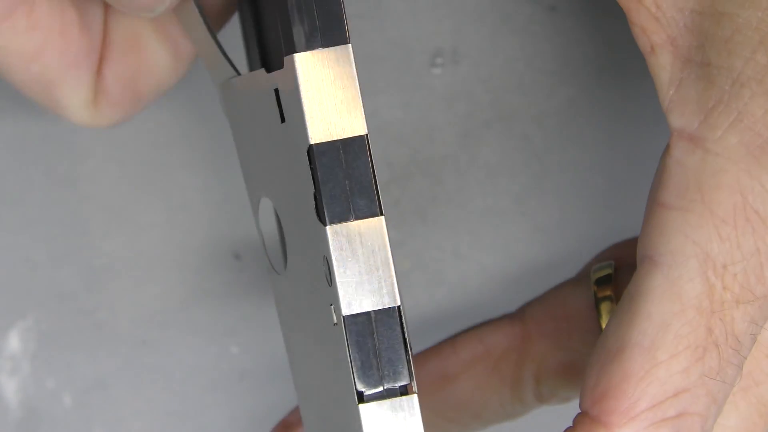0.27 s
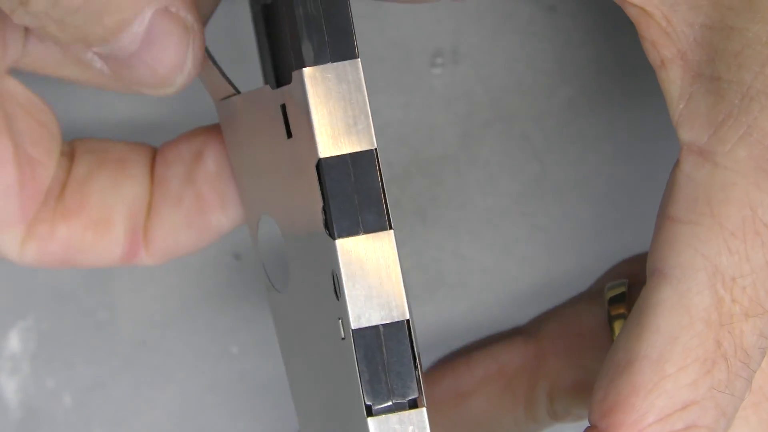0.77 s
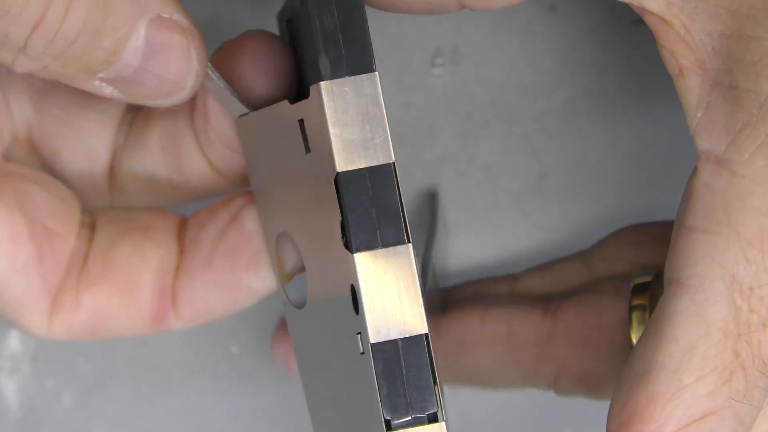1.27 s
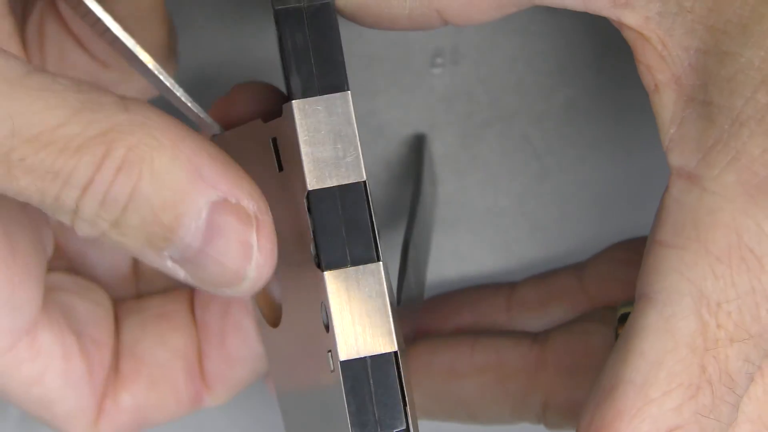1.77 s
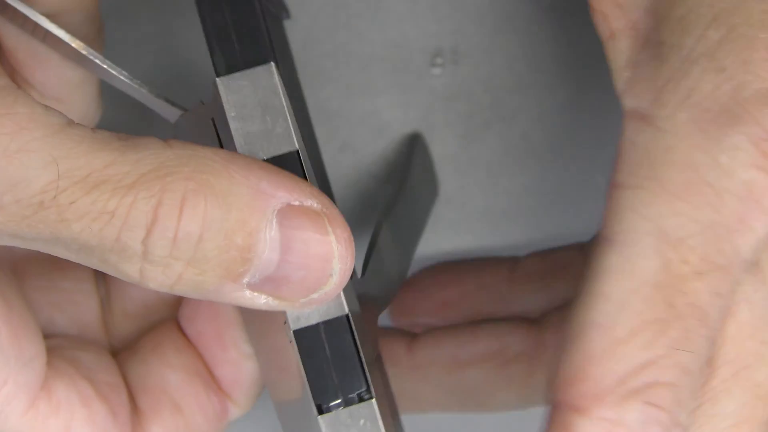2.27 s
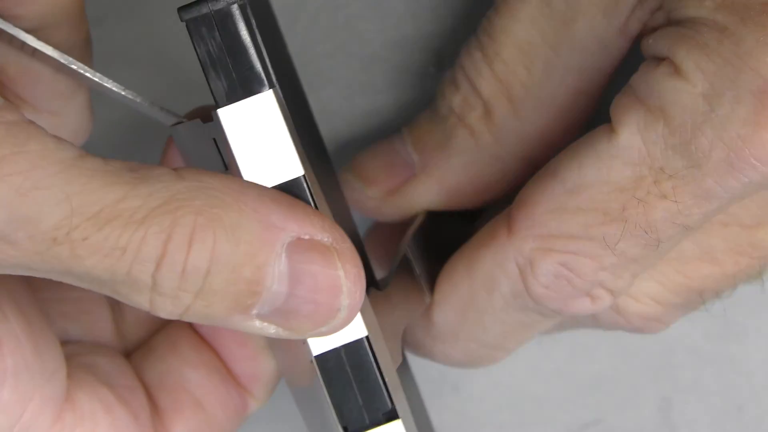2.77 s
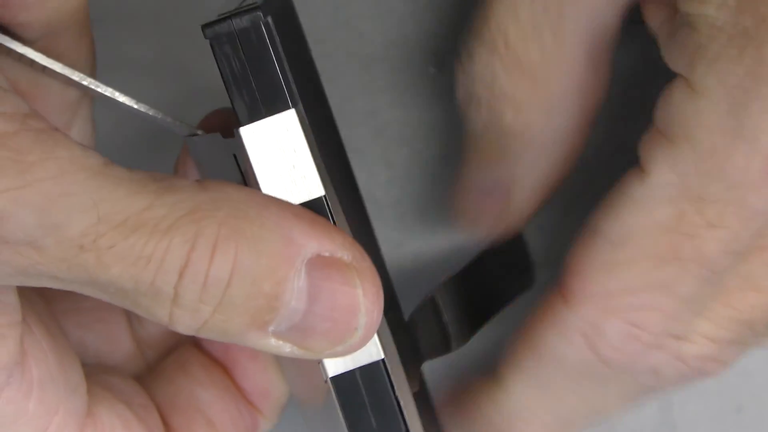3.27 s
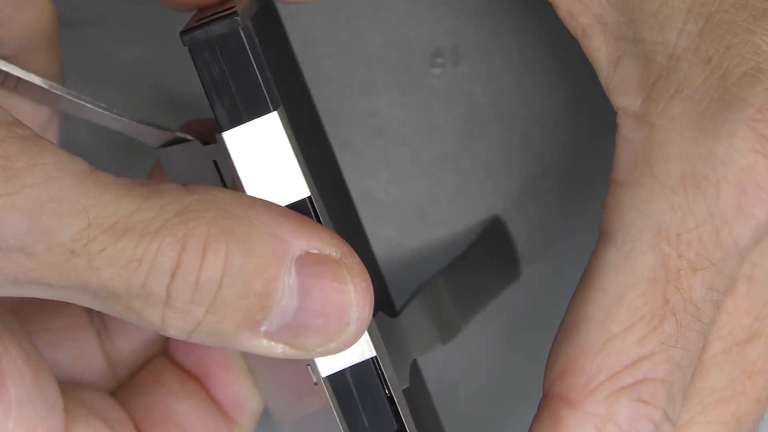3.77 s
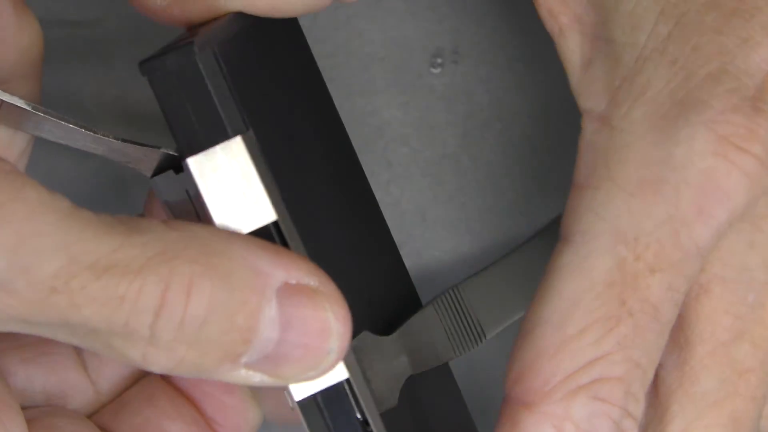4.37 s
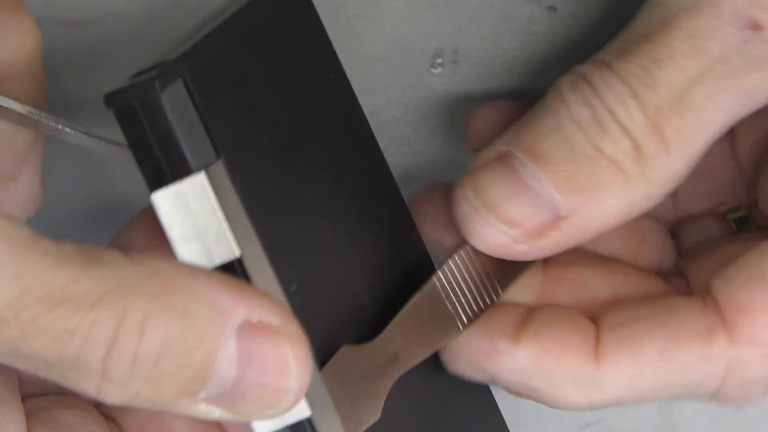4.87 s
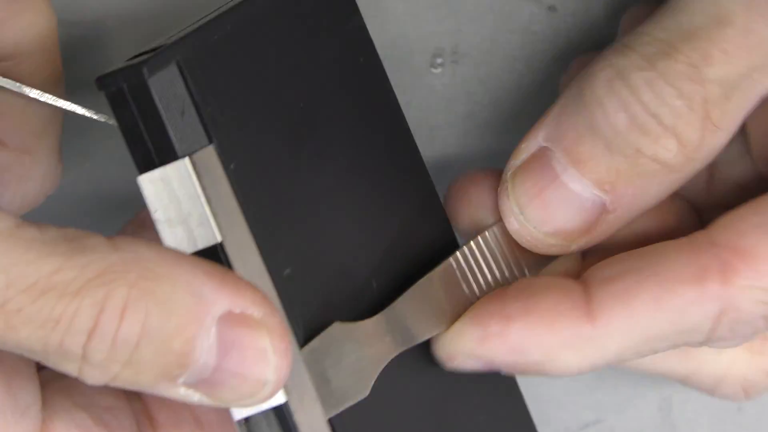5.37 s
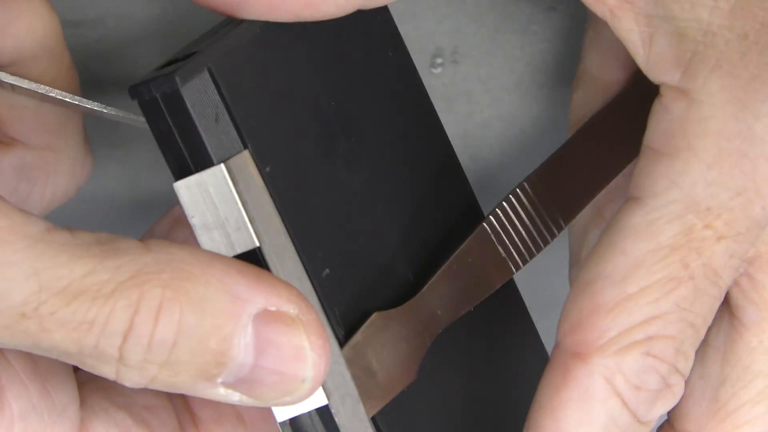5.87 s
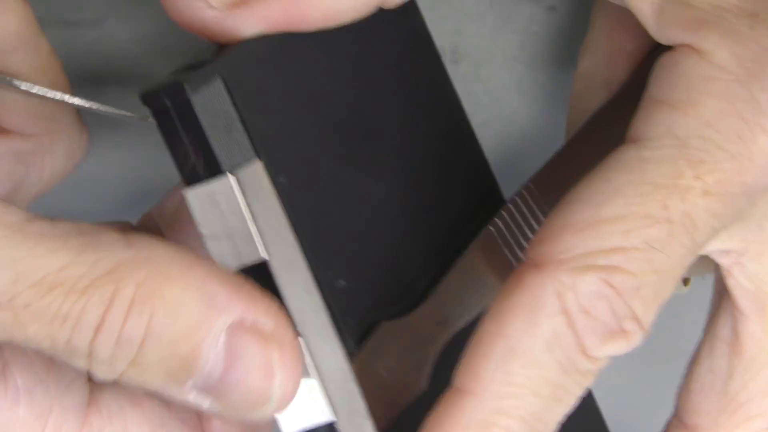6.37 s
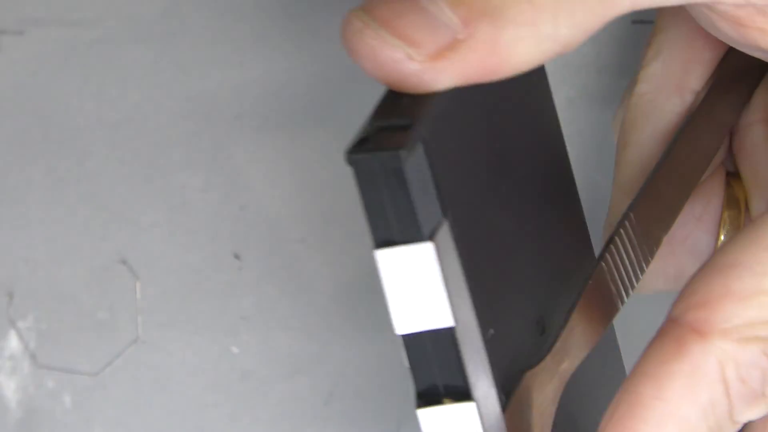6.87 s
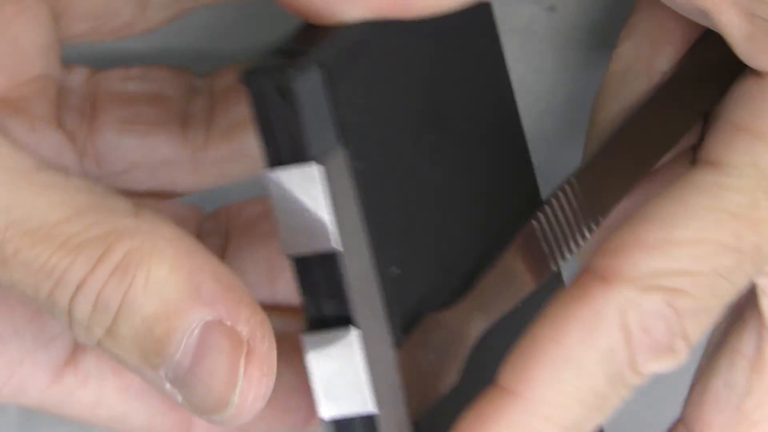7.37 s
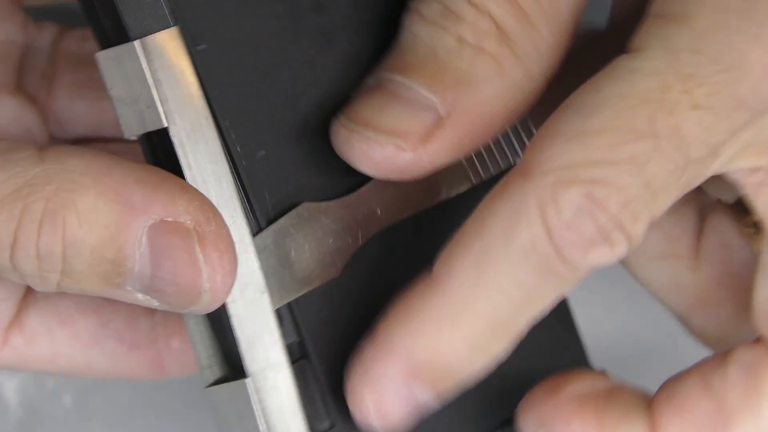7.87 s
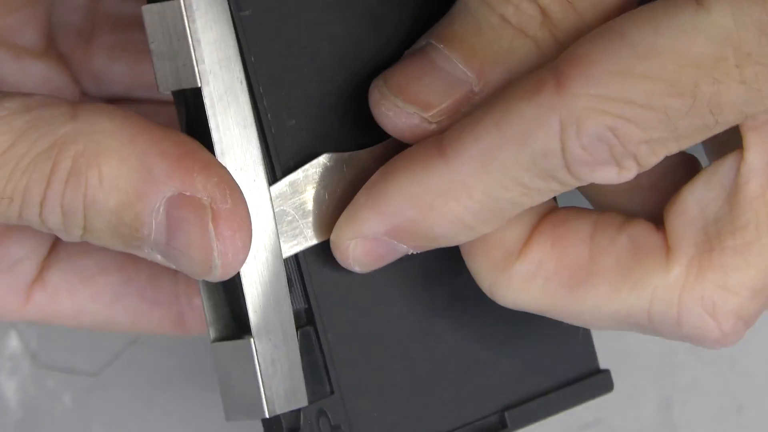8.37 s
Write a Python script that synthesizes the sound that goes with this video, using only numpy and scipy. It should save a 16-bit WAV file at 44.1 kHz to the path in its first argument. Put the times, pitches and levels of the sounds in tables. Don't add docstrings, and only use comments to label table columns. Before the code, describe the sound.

Small plastic clicks, snaps and blade scrapes as a plastic shell is pried apart, peaking in one hard crack in a quiet, humming workshop.

```python
import sys
import numpy as np
from scipy import signal
from scipy.fft import rfft, irfft, next_fast_len
from scipy.io import wavfile
from scipy.ndimage import uniform_filter1d, map_coordinates

SR = 44100
rng = np.random.default_rng(int(sys.argv[2]) if len(sys.argv) > 2 else 0)


def wav_record(signal):
    frames = np.transpose(np.atleast_2d(signal))
    bounded = np.clip(frames, -1, 1)
    quanta = np.round(bounded * 32767).astype(np.int16)
    wavfile.write(sys.argv[1], SR, quanta)


def level_to_linear(level):
    exponent = np.asarray(level, float) / 20
    return 10 ** exponent


N = 380583

# freq_hz, density_db_per_hz
HISS_SPECTRUM = [(15, -43), (25, -14.5), (75, -14), (144, -13), (179, -11), (351, -15), (447, -18),
                 (526, -31.5), (901, -22), (1630, -20.5), (2320, -26), (3380, -25.5), (6630, -34),
                 (7580, -34), (15700, -32)]
HISS_LEVEL_DB = -65
# freq_hz, likeness_0_to_1
HISS_LIKENESS = [(60, 0.38), (200, 0.18), (640, 0.68), (1410, 0.65), (3100, 0.51), (5000, 0.52),
                 (6000, 0.89), (8600, 0.87), (11000, .6), (15000, 0.31)]
# centre_hz, width_hz, level_db
FAN_TONES = [(1830, 40, 4.5), (1960, 83, -4.5), (2150, 27, -5.5), (2360, 56, -0.5), (3550, 46, -7.5),
             (3550, 76, -18), (4700, 28, -15), (11600, 54, -14)]
# pitch_hz, level_db
WHINE_TONES = [(7321, -86.5), (14637, -85.5)]
# time_s, level_db
DRONE_LEVEL = [(0.0, -84), (0.12, -69), (0.21, -94), (0.46, -80), (0.91, -85), (1.08, -82), (1.15, -77),
               (1.25, -68.5), (1.34, -68), (1.46, -66.5), (1.8, -90), (2.19, -67), (2.28, -76), (2.6, -79),
               (2.71, -66), (3.17, -72.5), (3.24, -81), (3.39, -71), (3.56, -97), (3.6, -76.5), (4.2, -65),
               (4.37, -89), (4.45, -71), (4.49, -82), (5.12, -85), (5.79, -72), (5.89, -80), (6.51, -85),
               (6.75, -102), (6.82, -65.5), (7.04, -62), (7.09, -88), (7.16, -55), (7.26, -45), (7.33, -57),
               (7.45, -71), (7.55, -74), (7.76, -88), (7.91, -77), (8.27, -79), (8.34, -84), (8.63, -89)]
# centre_hz, width_hz, level_db
DRONE_MODE = [(75, 12, 0)]
# freq_hz, t60_s, level_db
ROOM_DECAY = [(216, 0.52, 7), (755, 0.53, 3.5), (1510, 0.62, -4), (4160, 0.43, -1.5), (9300, 0.32, -2),
              (15000, 0.26, -11.5)]
# freq_hz, likeness_0_to_1
ROOM_LIKENESS = [(100, 0.22), (400, 0.83), (1500, 0.7), (4500, 0.41), (6000, 0.99), (8600, 0.97),
                 (12000, 0.57)]
# delay_s, level_db
NEAR_ECHOES = [(.0037, -5.5), (.0058, -7), (.0092, -17.5), (0.0131, -11), (.021, -18.5), (.027, -15)]
# start_s, peak_db, pitch_hz
DESK_KNOCKS = [(0.98, -55, 339), (1.2, -64, 207), (1.523, -57, 228), (2.014, -58.5, 266), (2.133, -56, 196),
               (3.365, -63, 223), (4.077, -57, 196), (5.039, -62, 423), (5.063, -75, 180),
               (5.558, -47, 664), (5.743, -52, 337), (6.165, -48, 520), (6.831, -61, 156),
               (6.957, -53, 183), (6.978, -49.5, 284), (7.147, -29, 476), (7.169, -41, 796),
               (2.134, -59.5, 188),
    (5.743, -60, 178),
    (6.956, -46, 207),
    (7.151, -37.5, 206),
    (7.189, -44, 283),
]
# (pitch_hz, level_db, t60_s)
BLADE_RINGS = [
    (6.42, -60, [(9450, 0, .05), (10450, -2, .06)]),
    (6.455, -56, [(2470, -4, .08), (4670, -3, .12), (7440, 0, .1), (10450, -6, .1), (13100, -8, .05)]),
    (6.958, -51, [(10310, -2, .16), (13060, 0, .16)]),
    (7.149, -40, [(3765, -2, .12), (5512, 0, .16), (6328, -8, .1), (10316, -6, .1)]),
]
# centre_hz, width_hz, level_db
SHELL_MODES = [(1056, 26, -2), (1380, 40, 3.5), (1610, 197, 7.5), (1744, 24, 0), (2021, 83, 9),
               (2327, 150, -6), (3010, 73, -27.5), (3826, 91, -9), (4240, 98, -3.5)]
# time_s, body_db, fizz_db
SCRAPE_STROKES = [
    [(0.0, -68, -84), (0.146, -66, -89.5), (0.3, -81, -72.5)],
    [(0.35, -73, -73), (0.512, -55, -78.5), (0.8, -92, -83)],
    [(1.85, -65.5, -78), (2.02, -64, -80)],
    [(3.7, -60, -83), (3.802, -65, -80), (3.85, -41, -67)],
    [(4.0, -70, -64), (4.084, -56.5, -60.5), (4.276, -68, -63), (4.444, -60, -64), (4.5, -65, -74)],
    [(4.85, -71, -74), (4.94, -61.5, -79), (5.3, -75, -97)],
    [(5.47, -56, -78), (5.528, -35.5, -58), (5.634, -56, -65), (5.696, -48.5, -67.5), (5.92, -59.5, -70)],
    [(6.1, -73, -77), (6.18, -81.5, -107), (6.292, -65, -73), (6.35, -64, -52), (6.55, -56.5, -77)],
    [(7.85, -65, -77), (7.928, -62, -70), (8.2, -70, -58)],
]
# start_s, peak_db, pitch_hz, ribs_db, edge_db, length_s
SHORT_SLIDES = [(0.0094, -42.5, 1420, -26, -22, 0.039), (0.452, -57, 1610, -23, -16, 0.037),
                (0.5385, -43.5, 1610, -26, -14, 0.035), (0.6015, -65.5, 1770, -21.5, -19, 0.014),
                (1.002, -46, 1540, -23, -9, 0.028), (2.1095, -36, 1610, -16, -8.5, 0.014),
                (3.3454, -45, 1490, -7, -9, 0.043), (3.761, -52, 1390, -2.5, -3, 0.031),
                (5.7006, -45, 1460, 5.5, -5, 0.049), (5.806, -44.5, 1930, -17, -27, 0.036),
                (6.412, -49, 1410, -5, -9, 0.025), (6.4497, -36.5, 1610, -11.5, -10, 0.02),
                (6.816, -54.5, 1880, -17, -12, 0.024), (6.926, -57, 1360, -4, -2.5, 0.03),
                (7.839, -47, 1580, -12, -8, 0.01), (7.8846, -35.5, 1610, -7.5, -15, 0.03),
                (8.3384, -47.5, 2110, -3, -10.5, 0.016)]
# start_s, peak_db, wall_hz, ribs_db, edge_db,
# looseness_db
CATCH_SNAPS = [(0.3721, -51, 1560, -29, -25, 4), (0.7188, -53, 1720, -20, -24, 0),
               (0.7522, -53.5, 1520, -26, -24, 0), (0.9802, -38, 1970, -31, -24, 4.5),
               (1.0095, -55.5, 1550, 0.5, -14, 6), (1.27, -26, 2560, -47, -23, 3.5),
               (1.269, -28.5, 1700, -8, -10, -13), (1.2839, -39, 1610, -21, -26, 0),
               (1.2974, -41, 1620, -17, -15, 8), (1.3392, -38, 1570, -11, -22, -11),
               (1.431, -49, 2020, -23, -23, -5), (1.483, -49.5, 1590, -25, -25, 2),
               (1.5253, -40, 1570, -25.5, -45, 5.5), (1.713, -57.5, 2280, -25, -10, 21),
               (1.7871, -45, 1520, -8, -10, 5), (1.9495, -52.5, 1600, -26, -22, 16),
               (1.9789, -43.5, 1463, -18, -20, 2), (2.0128, -32.5, 1610, -3, -13, 2),
               (2.032, -42, 2780, -4, -23, -4), (2.0807, -47, 1580, -14, -16, 4),
               (2.1224, -29, 2040, -35, -16, 2), (2.134, -21.5, 1540, -38, -40, 0),
               (2.1418, -31, 1880, -29, -30.5, -6), (2.2903, -48.5, 1580, -10, -6, 8.5),
               (3.3682, -43.5, 1520, -20, -23, -12), (3.8486, -30, 2640, -5.5, 7.5, 4),
               (3.8565, -33, 1580, 0, 3, 6), (3.8722, -33.5, 1670, 1, 13, -6),
               (4.0364, -59, 1630, 5, 11, 0), (4.0752, -39.5, 2140, -1, -14, 2),
               (4.137, -51.5, 2240, 7, 4, 3.5), (4.1894, -47, 1890, -11, -4, -6),
               (4.2397, -66, 1840, 6, 8, 16), (4.26, -69, 1830, 6, 2, 5),
               (4.3175, -32, 1610, -25, -36, -1.5), (4.4648, -49, 1650, -4.5, -12, 0),
               (4.7681, -44.5, 1130, -4, -21, 1.5), (4.9057, -52, 1820, -23, -20, 12),
               (5.2618, -51, 1570, -6, -18, 7), (5.458, -32.5, 1970, -23, -38, -0.5),
               (5.5604, -19.5, 1970, -23, -26, -7.5), (5.5944, -21.5, 1970, -30, -33, 5.5),
               (5.6316, -27, 2000, -23, -41, -0.5), (5.7338, -42.5, 1680, -17, -7, 0),
               (5.7413, -25, 1720, -20, -31, 1), (5.8282, -43, 1860, -9, -26, 0),
               (5.8325, -38, 1860, -35, -29, -5), (6.1157, -45.5, 1790, -10, -27, 1.5),
               (6.1419, -26.5, 1850, -22, -43, -3), (6.1677, -26.5, 1870, -16, -41, -4.5),
               (6.1786, -27.5, 1480, -36, -44, -3.5), (6.2781, -37.5, 1570, -22, -37, -0.5),
               (6.2938, -38.5, 1560, -30, -31, -1), (6.314, -56, 1670, -22, -24, 4),
               (6.3624, -46, 1510, -19, -18, -4), (6.916, -50.5, 1380, -7.5, -6.5, 17),
               (6.9566, -28, 1640, -40, -11.5, 2.5), (6.9635, -28, 1560, -33, -24, 3),
               (6.9824, -33, 1510, -42, -39, 9), (6.9988, -33.5, 1510, -31, -21, 1),
               (7.1474, -19, 1150, 0.5, -0.5, 2), (7.1499, -9.5, 1700, -44, -24, -13.5),
               (7.1543, -16.5, 1320, -5, -7, 2), (7.1569, -20.5, 1490, -40, -21, 4),
               (7.172, -16.5, 1340, -33, -17, 7), (7.2486, -28, 1470, -4.5, -16, 6),
               (7.45, -47.5, 1350, -11, -15, 11), (7.6584, -37.5, 1700, -3.5, -14, 2),
               (7.6718, -42, 1770, -16, -25, -19), (7.6797, -46.5, 1530, -36, -23, 3),
               (7.8365, -58, 1560, -21, -9, -13), (7.8913, -44, 1660, 0, -4.5, -1),
               (7.9056, -42, 2000, -26, -12, 10), (7.9502, -46, 1610, 0, -24, -1),
               (8.0592, -39.5, 1760, -22, -17, -5), (8.0697, -42.5, 1910, -6, -22, 3),
               (2.1343, -24, 1600, -14, -24, -2),
    (4.2605, -62, 1800, 10, 8, 4),
    (5.7345, -30, 1600, -6, -16, 3),
    (5.8348, -32, 1900, -10, -18, -4),
]
# freq_hz, left_minus_right_db
PORT_LEAN = [(60, -2), (180, -1.0), (550, 1.5), (1650, 1.0), (4970, 1), (15000, 0.0)]
STEADY_HZ, ATTACK_HZ = 15780, 16750


def unit(x):
    return x / np.sqrt(np.mean(x ** 2) + 1e-20)


def along(points, hz, axis=1):
    points = np.asarray(points)
    return np.interp(np.log(hz + 1), np.log(points[:, 0] + 1), points[:, axis])


def filtered(x, response):
    padded = next_fast_len(x.shape[-1] + 4096)
    spectrum = rfft(x, padded) * response(np.fft.rfftfreq(padded, 1 / SR))
    return irfft(spectrum, padded)[..., :x.shape[-1]]


def modes(table):
    def response(f):
        total = 0
        for k, (centre_hz, width_hz, db) in enumerate(table):
            damping = 1j * f * width_hz
            total = total + (-1) ** k * level_to_linear(db) * damping / (centre_hz ** 2 - f * f + damping)
        return total
    return response


def above(hz):
    return lambda f: (1j * f / hz) ** 2 / (1 + 1.2j * f / hz - (f / hz) ** 2)


def wobble(rate_hz):
    knots = rng.standard_normal(int(N * rate_hz / SR) + 4)
    return map_coordinates(knots, [np.arange(N) * rate_hz / SR])


def pair(size, likeness):
    def mid_side(hz):
        turn = np.arccos(np.clip(along(likeness, hz), -1, 1)) / 2
        return np.array([np.cos(turn), np.sin(turn)])
    mid, side = filtered(rng.standard_normal((2, size)), mid_side)
    return np.array([mid + side, mid - side])


def grit(size, spiky_db):
    strength = np.repeat(rng.exponential(size=size), 12)[:size]
    return unit(rng.standard_normal(size) * level_to_linear(spiky_db * strength))


def add(track, start_s, sound):
    spot = track[round(start_s * SR):][:len(sound)]
    spot += sound[:len(spot)]


def workshop():
    t = np.arange(N) / SR
    hiss = unit(filtered(pair(N, HISS_LIKENESS), lambda f: level_to_linear(along(HISS_SPECTRUM, f))))
    hiss = level_to_linear(HISS_LEVEL_DB + 1.5 * wobble(3.89)) * hiss
    fan = level_to_linear(-71) * unit(filtered(pair(N, HISS_LIKENESS), modes(FAN_TONES)))
    whine = np.zeros(N)
    for hz, db in WHINE_TONES:
        level = level_to_linear(db + 5.5 + 1.1 * wobble(10))
        whine += level * np.sin(2 * np.pi * hz * t + 0.36 * wobble(30))
    drone = unit(filtered(pair(N, [(75, .9)]), lambda f: modes(DRONE_MODE)(f) ** 2))
    drone = level_to_linear(np.interp(t, *np.transpose(DRONE_LEVEL))) * drone * level_to_linear([[-2.5], [2.5]])
    return hiss + fan + whine + drone


def room(x):
    step, size = SR // 4, 30000
    out = np.zeros((2, N + 2 * SR))
    for start in range(0, N, step):
        hz, t, z = signal.stft(pair(size, ROOM_LIKENESS), SR, nperseg=256)
        decay = level_to_linear(-60 * t / along(ROOM_DECAY, hz)[:, None]) * (1 - np.exp(-t / 0.0045))
        energy = np.sum(decay ** 2, axis=1, keepdims=True) * 128
        decay *= level_to_linear(along(ROOM_DECAY, hz, axis=2))[:, None] / np.sqrt(energy)
        tail = signal.istft(z * decay, SR, nperseg=256)[1]
        block = np.resize(x[start:][:step], (1, step))
        spot = out[:, start:][:, :step + tail.shape[1] - 1]
        spot += signal.fftconvolve(block, tail, axes=1)
    return out[:, :N]


def echoes(x):
    dull = filtered(x, lambda f: 1 / (1 + 1j * f / 12000))
    out = np.zeros((2, N))
    for delay_s, db in NEAR_ECHOES:
        lags = round(delay_s * SR) + rng.integers(-2, 3, size=2)
        out += level_to_linear(db) * np.array([np.roll(dull, lag) for lag in lags])
    return out


def knocks():
    out, t = np.zeros(N), np.arange(4096) / SR
    for start_s, db, hz in DESK_KNOCKS:
        burst = level_to_linear(-60 * t / 0.013) * rng.standard_normal(len(t))
        thud = filtered(burst, modes([(hz, hz / 1.4, 0), (hz * 3.87, hz, -8)]))
        thud = filtered(thud, lambda f: above(110)(f) / (1 + 1j * f / 700))
        add(out, start_s, level_to_linear(db + 5.5) * thud / np.max(np.abs(thud)))
    return out


def blade():
    out, t = np.zeros(N), np.arange(SR // 3) / SR
    for start_s, db, steel in BLADE_RINGS:
        for hz, level_db, t60_s in steel:
            beat = 1 - .7 * np.cos(2 * np.pi * rng.uniform(24, 32) * t)
            envelope = level_to_linear(db + level_db - 60 * t / min(t60_s, .25)) * (1 - np.exp(-t / 0.0024))
            add(out, start_s, envelope * beat * np.sin(2 * np.pi * hz * t))
    return out


def scrape():
    body_db, fizz_db = np.full((2, N), -130.)
    for rows in SCRAPE_STROKES:
        s, *levels_db = np.transpose(rows)
        span = np.arange(round(s[0] * SR), round(s[-1] * SR))
        fade_db = 20 * np.log10(signal.windows.tukey(len(span), .25) + 1e-4)
        body_db[span], fizz_db[span] = [np.interp(span / SR, s, db) + fade_db for db in levels_db]
    rub = grit(N, spiky_db=2) * level_to_linear(0.83 * wobble(25))
    body = unit(filtered(rub, modes(SHELL_MODES + [(2400, 5000, -16.5)])))
    body = filtered(body, above(1200))
    fizz = unit(filtered(rub, modes([(8700, 15000, 0)])))
    return level_to_linear(body_db - 7.5) * body + level_to_linear(fizz_db - 16.5) * fizz


def even(x):
    energy = np.linalg.norm(x, axis=1, keepdims=True)
    return x / energy * np.linalg.norm(x[0]) / np.max(np.abs(x[0]))


def struck(force, wall_hz, ribs_db, edge_db):
    both = np.array([force, np.arange(len(force)) == 0])
    slip = rng.standard_normal(384) * level_to_linear(-.16 * np.arange(384))
    ragged = np.array([signal.fftconvolve(force, slip)[:len(force)], both[1]])

    def wall_response(f):
        ringing = modes([(wall_hz, wall_hz / 3.02, 0)])(f) + level_to_linear(-9.0) * modes(SHELL_MODES)(f)
        return above(.72 * wall_hz)(f) ** 2 * ringing

    wall = filtered(both, wall_response)
    ribs = filtered(both, lambda f: -above(2100)(f) ** 2 * modes([(3600, 1600, 0), (5300, 2000, -4)])(f))
    edge = filtered(ragged, lambda f: above(5800)(f) * modes([(8500, 9000, 0)])(f))
    return even(wall) + level_to_linear(ribs_db + 4.5) * even(ribs) + level_to_linear(edge_db + 3.0) * even(edge)


def slides():
    out = np.zeros(N)
    for start_s, db, hz, ribs_db, edge_db, length_s in SHORT_SLIDES:
        u = np.arange(6000) / SR / max(length_s, .004)
        force = u * np.exp(-2.5 * u) * grit(len(u), spiky_db=2.5)
        add(out, start_s - .004, level_to_linear(db - 4) * struck(force, hz, ribs_db, edge_db)[0])
    return out


def snaps():
    near, sent, t = np.zeros(N), np.zeros(N), np.arange(2048) / SR
    for start_s, db, hz, ribs_db, edge_db, loose_db in CATCH_SNAPS:
        force = level_to_linear(1.9 * loose_db - 21.5 - 60 * t / 0.028) * grit(len(t), spiky_db=3.5)
        force[:3] += [.6, 1, .4]
        click, blow = level_to_linear(db + 1.0) * struck(force, hz, ribs_db, edge_db)
        add(near, start_s + .0006, click)
        add(sent, start_s + .0006, level_to_linear(0.65 * loose_db) * blow)
    return near, sent


def scene():
    near, sent = snaps()
    rest = slides() + scrape() + knocks() + blade()
    return near + rest + echoes(near + rest) + room(sent + rest) + workshop()


def band_limit(x):
    return signal.sosfilt(signal.butter(12, 16830, fs=SR, output="sos"), x)


def record(dry):
    ports = filtered(dry, lambda f: level_to_linear(along(PORT_LEAN, f) * [[.5], [-.5]]))
    ports = ports / (1 + np.abs(ports / .45) ** 4) ** .25
    ports = filtered(ports, lambda f: f < ATTACK_HZ)
    top = filtered(ports, lambda f: f > STEADY_HZ)
    now, around = (uniform_filter1d(np.abs(top[0]), size=size) for size in (128, 2048))
    attack = uniform_filter1d(1. * (now > 2.4 * around + level_to_linear(-75)), size=512) * 8
    gate = uniform_filter1d(np.clip(attack, 0, 1), size=200)
    return band_limit(ports - top * (1 - gate))


dry = scene()
out = record(dry)
wav_record(out)
```